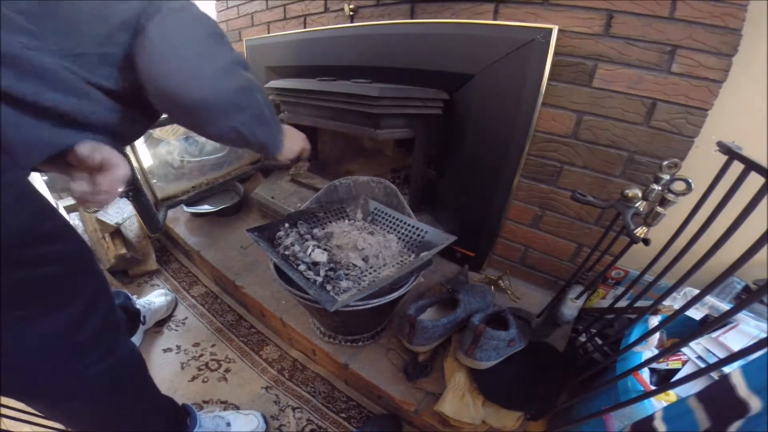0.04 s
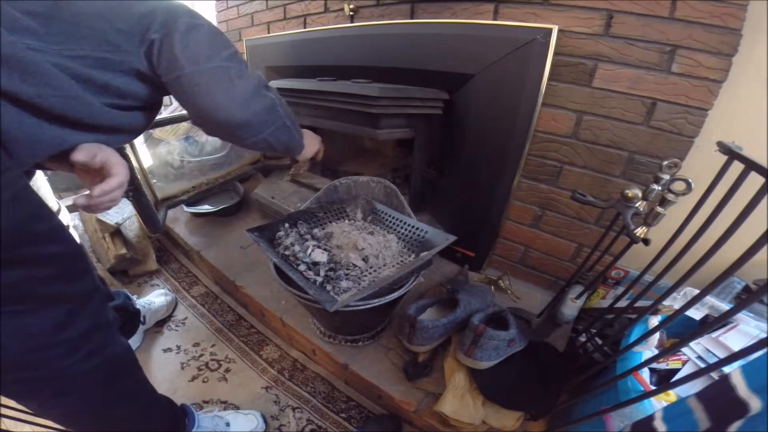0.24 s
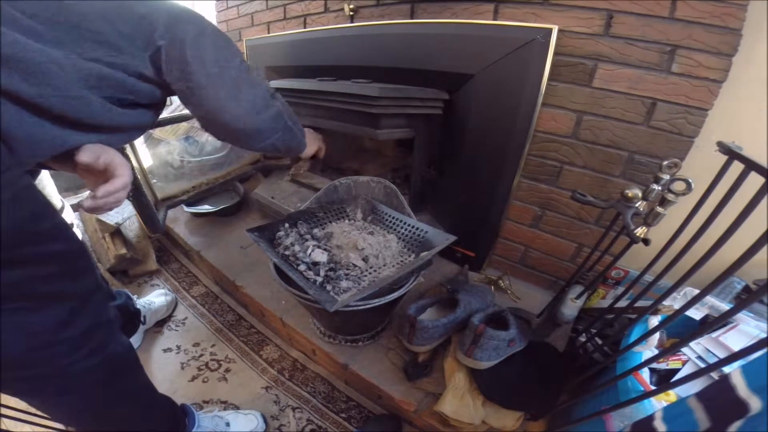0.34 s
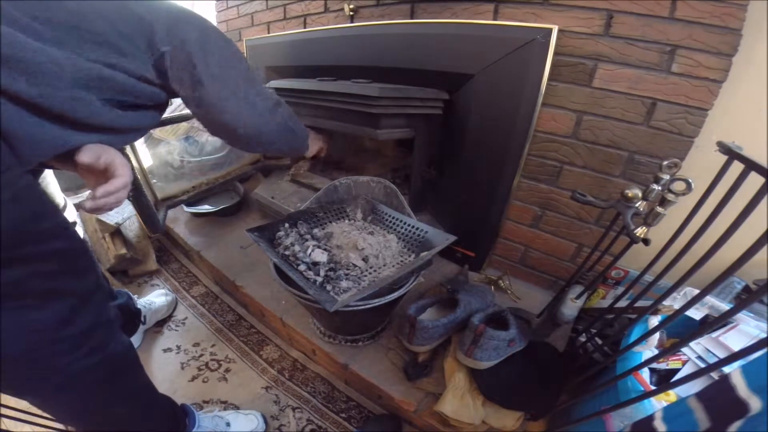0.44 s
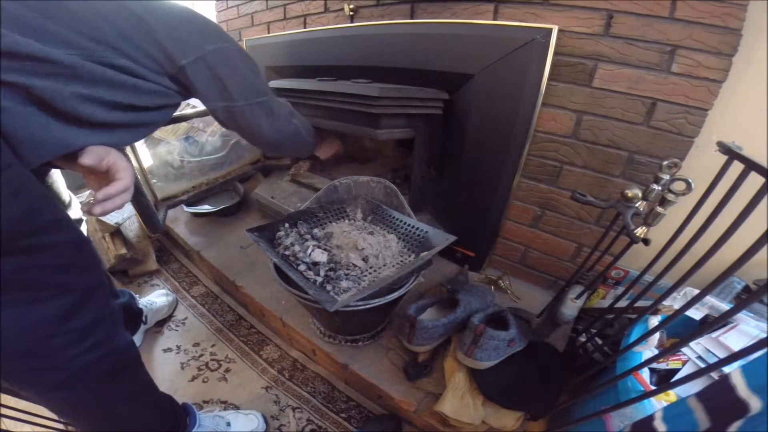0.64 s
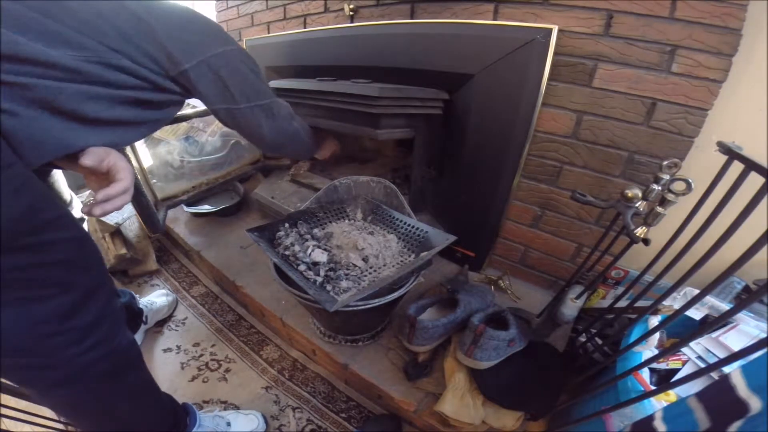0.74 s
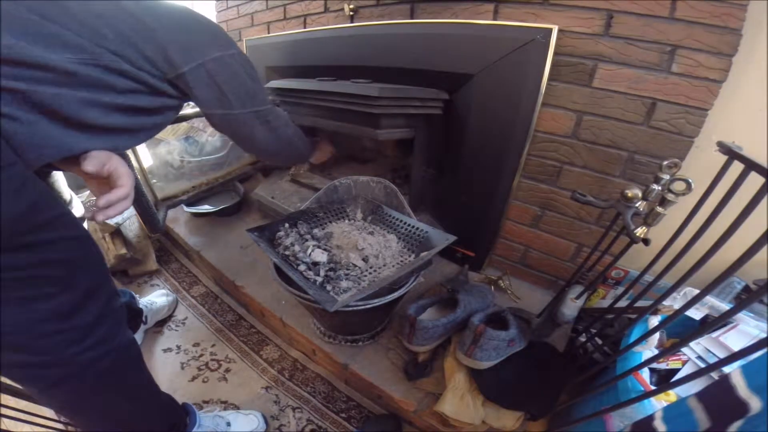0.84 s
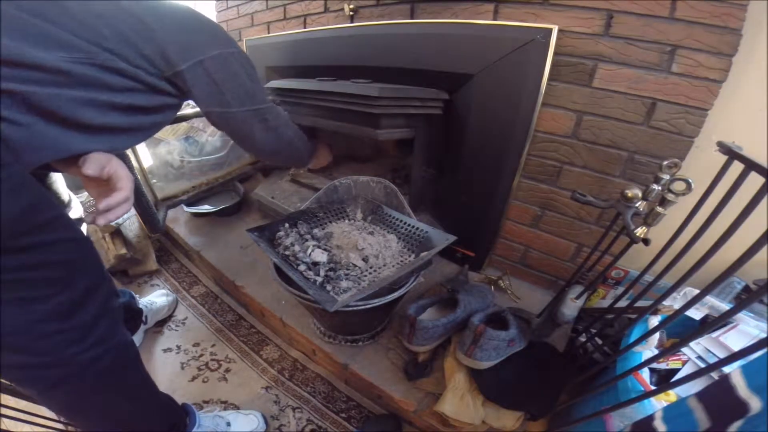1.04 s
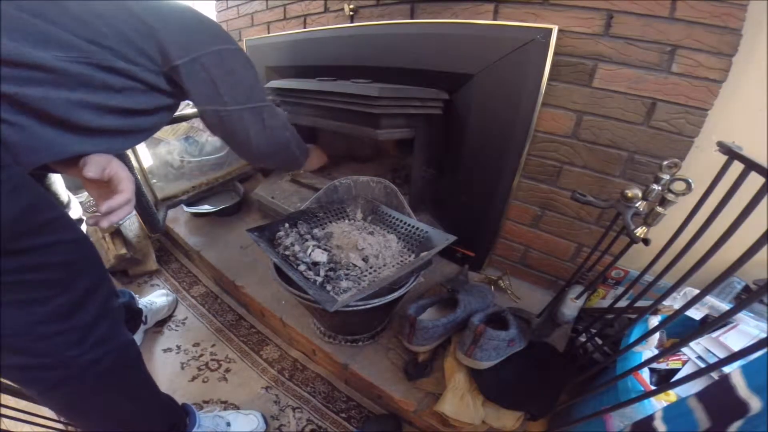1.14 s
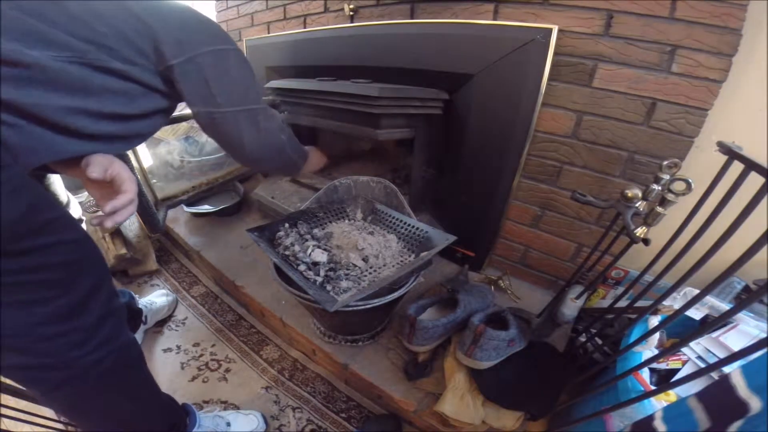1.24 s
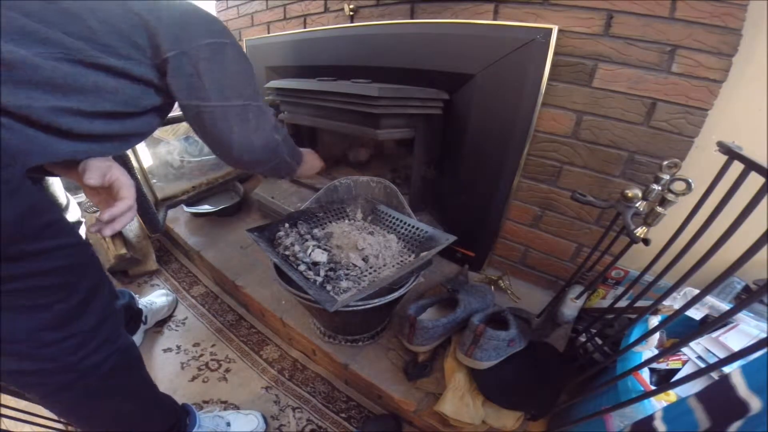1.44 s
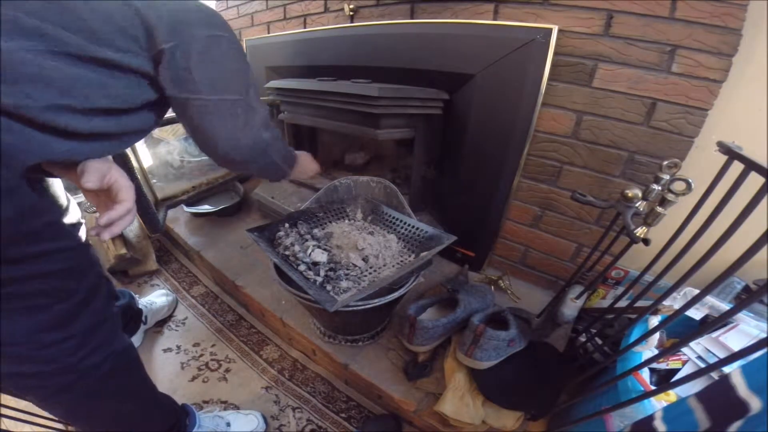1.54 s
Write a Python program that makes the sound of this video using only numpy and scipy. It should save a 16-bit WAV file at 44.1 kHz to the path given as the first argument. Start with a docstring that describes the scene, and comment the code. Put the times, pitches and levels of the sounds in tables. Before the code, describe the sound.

A small metal shovel scrapes through ash and coals inside a hollow, booming iron stove box.

```python
"""Over a quiet room and a faint pulsing whine, the iron box of a stove booms. A small steel shovel lands on
the firebox floor, is pushed through ash and coals, bumps the back and taps twice on its way out.
Random grain impacts excite the resonant modes of blade and walls and a broadband hiss; single grains and
lumps of coal are decaying sines, the boom is noise through low modes, the room shaped noise, the whine
a gated sine with a little buzz."""
import sys
import numpy as np
from scipy import signal
from scipy.fft import rfft, irfft
from scipy.io import wavfile

SR = 44100
rng = np.random.default_rng(int(sys.argv[2]) if len(sys.argv) > 2 else 0)


def generate_wav(signal):
    """Clip the signal to [-1, 1] and save it as 16-bit WAV at the path in sys.argv[1]."""
    frames = np.transpose(np.atleast_2d(signal))
    scaled = np.clip(frames, -1, 1) * 32767
    pcm = np.round(scaled).astype(np.int16)
    wavfile.write(sys.argv[1], SR, pcm)


N = 70560  # samples


def amp(db):
    """Decibels to amplitude: 20 dB is a factor of ten."""
    return 10 ** (np.asarray(db) / 20)


def rms_one(x):
    """Normalisation by the root mean square."""
    return x / np.sqrt(np.mean(x ** 2) + 1e-20)


def in_time(rows, edge_s=0.027):
    """Linear interpolation of levels over time; the first column falls silent just outside the table."""
    s, first, *rest = np.transpose(rows)
    t = np.arange(N) / SR
    outside_s = np.maximum(s[0] - t, t - s[-1])
    fade_db = 40 * np.clip(outside_s / edge_s, 0, 3)
    return [np.interp(t, s, first) - fade_db] + [np.interp(t, s, column) for column in rest]


def drift(rate_hz):
    """Low-passed noise: two equal real poles leave a slow random fluctuation of rms 1."""
    settling = 8000  # samples dropped while the filter settles
    r = np.exp(-2 * np.pi * rate_hz / SR)
    slow = signal.lfilter([1], [1, -2 * r, r * r], rng.standard_normal(N + settling))
    return rms_one(slow[settling:])


def grains(per_s, spread_db):
    """Shot noise: clicks at random instants, of uneven size and either sign, rms 1."""
    size = amp(spread_db * np.minimum(rng.exponential(1, N), 5))
    signed_size = size * rng.choice([-1, 1], N)
    return rms_one(signed_size * (rng.random(N) < per_s / SR))


def body(x, pitches_hz, modes, flutter_db=0.0):
    """Modal superposition: parallel resonators, each driven by a randomly fluctuating share of the input.

    Each mode: width in Hz, level in dB; white noise of rms 1 gives an rms near 1 without flutter."""
    flutter_hz = 33
    out, power = 0, 0
    for k, (hz, (width, db)) in enumerate(zip(pitches_hz, modes)):
        r = np.exp(-np.pi * max(width, 3) / SR)  # a wider resonance decays faster
        driven = x * amp(flutter_db * drift(flutter_hz)) + 1e-18
        zeros = np.array([1, 0, -1]) * (1 - r * r) / 2
        poles = [1, -2 * r * np.cos(2 * np.pi * hz / SR), r * r]
        sign = (-1) ** k  # neighbouring modes have opposite polarity
        out = out + sign * amp(db) * signal.lfilter(zeros, poles, driven)
        power += amp(db) ** 2 * (1 - r * r) / 2
    return out / np.sqrt(power)


def colour(x, spectrum):
    """Spectral shaping by a table of (Hz, relative dB per Hz), falling away beyond its ends.

    White noise of rms 1 gives an rms near 1."""
    hz, db = np.transpose(spectrum)
    f = np.arange(N // 2 + 1) * SR / N + 1  # offset by 1 Hz so the logarithm exists
    low_fall = np.minimum(f / hz[0], 1) ** 3
    high_fall = np.minimum(hz[-1] / f, 1) ** 3
    gain = amp(np.interp(np.log(f), np.log(hz), db)) * low_fall * high_fall
    return irfft(rfft(x) * rms_one(gain), N)


def rings(events, rise_s):
    """Damped free vibration: each blow swells over its contact time and decays exponentially."""
    out = 0
    for s, hz, db, t60 in events:
        t = np.maximum(np.arange(N) / SR - s, 0)
        swell = 1 - np.exp(-t / rise_s)
        decay = amp(db - 60 * t / t60)
        out = out + swell * decay * np.sin(2 * np.pi * (hz * t + rng.random()))
    return out


def quiet_room():
    """Stationary background noise: white noise given the room's spectrum."""
    # Spectrum of the room. Each row: frequency in Hz, relative density in dB per Hz.
    room_spectrum = [(120, -66), (200, -1.5), (363, -8), (774, -6.5), (1590, -17), (1780, -14), (1940, -16),
                     (2200, -14), (11000, -29.5), (14900, -34.5)]
    room_db = -63
    return amp(room_db) * colour(rng.standard_normal(N), room_spectrum)


def boom():
    """Low-order modes of a box: noise shakes the whole box and the floor under it at a few low pitches."""
    # Levels over time. Each row: time in seconds, then lower modes, upper modes and deepest rumble in dB.
    boom_levels = [(0.0, -43, -57, -66), (0.066, -66, -60.5, -48.5), (0.098, -66, -73, -62),
                   (0.182, -60.5, -65, -49), (0.218, -51.5, -50.5, -47.5), (0.338, -67, -55.5, -49.5),
                   (0.422, -49.5, -58, -59), (0.454, -63, -51.5, -44), (0.556, -61, -52, -52),
                   (0.632, -47.5, -47.5, -44), (0.676, -48, -47.5, -62), (0.716, -52, -45, -52),
                   (0.748, -60, -47, -47), (0.802, -38, -39.5, -48), (0.86, -44, -45, -49),
                   (0.944, -47, -53, -56), (0.97, -43.5, -49.5, -56), (1.002, -53.5, -47, -48.5),
                   (1.132, -45.5, -50.5, -46), (1.158, -54, -56.5, -45), (1.444, -56, -62, -58.5),
                   (1.5, -73, -63.5, -62), (1.536, -52, -72.5, -61.5), (1.6, -65, -58.5, -55)]
    # Pitches in Hz of the deepest, lower and upper modes.
    rumble_hz = [39, 62]
    box_low_hz = [80, 110]
    box_high_hz = [158, 182, 265, 321]
    # The same modes. Each row: width in Hz, relative level in dB.
    rumble_modes = [(12, 5), (18, -8.5)]
    box_low_modes = [(25, -1.5), (25, 2.5)]
    box_high_modes = [(14.6, -0.5), (22.4, -3), (16.2, -11), (20.4, -11.5)]

    low_db, high_db, rumble_db = in_time(boom_levels)
    # a broad second resonance confines each group of modes to its own band
    low = body(body(rng.standard_normal(N), box_low_hz, box_low_modes), [95], [(90, 0)])
    high = body(body(rng.standard_normal(N), box_high_hz, box_high_modes), [220], [(300, 0)])
    rumble = body(body(rng.standard_normal(N), rumble_hz, rumble_modes), [42], [(70, 0)])
    return amp(low_db) * rms_one(low) + amp(high_db) * rms_one(high) + amp(rumble_db) * rms_one(rumble)


def whine():
    """Amplitude modulation: a periodic gate cuts a high tone and a little buzz into regular pips."""
    tone_hz, tone_db, buzz_db = 11200, -74.5, -75
    first_s, length_s, period_s = 0.016, 0.016, 1 / 23.976  # centre of a pip, its width at 1/e, spacing
    t = np.arange(N) / SR
    from_centre_s = (t - first_s + period_s / 2) % period_s - period_s / 2
    gate = np.exp(-(2 * from_centre_s / length_s) ** 4)
    tone = np.sin(2 * np.pi * tone_hz * t)
    buzz = body(rng.standard_normal(N), [11300], [(1800, 0)])
    return gate * (amp(tone_db) * tone + amp(buzz_db) * buzz)


def coals():
    """Modal excitation by friction: coals grind on the walls as coarse grains, ringing them and crunching."""
    # Grinding over time. Each row: time in seconds, level of the lower wall modes and of the upper in dB.
    grind = [(.19, -67, -82), (.206, -69, -44.5), (.235, -57, -54), (.272, -56, -55), (.292, -57.5, -53),
             (.33, -66, -65), (.354, -61.5, -60), (.412, -63.5, -67), (.47, -69, -66), (.585, -59.5, -70),
             (.6, -44.5, -49), (.64, -52.5, -50), (.675, -54, -51.5), (.7, -44.5, -51), (.748, -65, -59),
             (.765, -44, -58), (.773, -47, -42), (.82, -60.5, -56), (.86, -51.5, -58), (.9, -60.5, -65),
             (1.0, -61.5, -67.5), (1.04, -62, -69), (1.052, -53, -44), (1.08, -57, -55.5),
             (1.15, -64, -64.5), (1.25, -66, -73.5), (1.4, -68, -81)]
    # Pitches in Hz of the lower and upper wall modes.
    wall_low_hz = [402, 440, 546, 598, 635]
    wall_high_hz = [826, 906, 1000, 1105, 1200, 1251, 1452]
    # The same modes. Each row: width in Hz, relative level in dB.
    wall_low_modes = [(29, 0), (28.4, 1), (27, -0.5), (25, -9), (21.2, -1.5)]
    wall_high_modes = [(29.6, -3.5), (30.8, 5), (62.5, -2), (52, 3.5), (34.5, 0), (32, 2), (37.6, 0)]

    crunch_db = -2.5  # against the upper wall modes
    low_db, high_db = in_time(grind)
    coal = grains(per_s=1500, spread_db=3.5)
    dull = colour(coal, [(500, 6), (1000, -4), (1800, 1.5)])
    crunch = amp(crunch_db + high_db) * dull
    low = body(amp(low_db) * coal, wall_low_hz, wall_low_modes, flutter_db=3.5)
    high = body(amp(high_db) * coal, wall_high_hz, wall_high_modes, flutter_db=2.0)
    return low + high + crunch


def blade():
    """Source and resonator: stroke and knocks set the force of the grit; blade modes and a hiss answer."""
    # Dragging over grit. Each row: time in seconds, level in dB, treble and top relative to it in dB,
    # loose ash hiss in dB (a quarter of treble plus top is added to it).
    stroke = [(.25, -58.5, -14, -30, 0), (.27, -63.5, -12, -25, -3), (.31, -62, -8, -25.5, 0),
              (.362, -54.5, -5, -18, 2.5), (.41, -62, 0.5, -14, 0.5), (.445, -46.5, -5.5, -18.5, -5),
              (.47, -45, -6.5, -27, -7), (.51, -45.5, -6, -21, -2), (.566, -49.5, -3.5, -14, -1.5),
              (.6, -45, -6, -17.5, 5), (.64, -46.5, -5, -16, -0.5), (.695, -45, -4, -13.5, 3.5),
              (.72, -51.5, -5, -17, 0), (.76, -58, -7, -12.5, 3), (.79, -59, -22, -22, -3),
              (.83, -57, -4.5, -19, -11), (.86, -59, -29, -42, -17), (.885, -70, -14, -32, -4)]
    # Brief knocks and skids. Each row: start in seconds, the same four levels in dB, then rise, hold and
    # 60 dB decay time in seconds.
    knocks = [(0.195, -42, -18, -34.5, -5, .001, 0.0034, 0.066),
              (0.201, -50.5, -5.5, -25, 3, .003, 0.012, 0.11),
              (0.281, -58.5, -17.5, -34, 3, 0.0027, 0.0065, 0.058),
              (0.617, -46, -16, -24, 1, 0.0022, 0.0063, 0.055),
              (0.729, -54, 1, -15, 0, 0.0042, .004, 0.032), (0.77, -57, -7, -15, 8, 0.0011, 0.0052, 0.021),
              (0.946, -60.5, 2, -34, -8, 0.0064, 0.025, 0.052),
              (0.979, -51.5, -8, -24, -12, 0.0027, 0.0086, 0.04),
              (1.04, -49.5, -3, -28, -1, .001, 0.011, 0.03),
              (1.054, -55.5, -20, -34, -7, 0.0035, 0.022, 0.24)]
    # Pitches in Hz of the low, high, edge and top modes of the blade.
    low_hz = [1235, 1450, 1560, 1810, 2090, 2200, 2288, 2520, 2900]
    high_hz = [3780, 4310, 5000, 5230, 5400, 5960]
    edge_hz = [6910, 7410]
    top_hz = [8680, 11400, 12500]
    # The same modes. Each row: width in Hz, relative level in dB.
    low_modes = [(70.5, -7), (24.7, -5), (35, -5), (24.6, -15.5), (33.8, -1), (41, -1.5), (29, 4),
                 (62.6, -2), (151, -9.5)]
    high_modes = [(49, 0), (29.6, -5), (50, -10), (49.5, 3.5), (61, 1.5), (123, 6)]
    edge_modes = [(40, 1), (150, -2.5)]
    top_modes = [(300, -5), (249, 7), (600, -25)]
    # Hiss of grit, main and top band. Each row: frequency in Hz, relative density in dB per Hz.
    grit_spectrum = [(900, -51), (2000, 11), (3000, 0.5), (4500, -2), (7500, -2.5), (8500, -14.5)]
    grit_top_spectrum = [(8000, -10.5), (13000, -12), (15000, -10)]

    grains_per_s, spread_db, flutter_db, hiss_db = 6000, 3.5, 1.5, 0.5
    t = np.arange(N) / SR
    level_db, treble_db, top_db, ash_db = in_time(stroke)
    ash_db = ash_db + (treble_db + top_db) / 4
    force = amp(level_db + np.array([0 * level_db, treble_db, top_db, ash_db]))
    for s, db, treble_db, top_db, ash_db, rise, hold, t60 in knocks:
        attack = np.clip((t - s) / max(rise, .0005), 0, 1)
        decay = amp(db - 60 * np.maximum(t - s - rise - hold, 0) / t60)
        balance = amp([[0], [treble_db], [top_db], [ash_db + (treble_db + top_db) / 4]])
        force = force + balance * attack * decay
    low, high, top, ash = force

    grit = grains(grains_per_s, spread_db)
    dust = grains(grains_per_s, spread_db)
    edge_force = np.sqrt(high * top)  # midway in dB between the two bands
    modes = (body(low * grit, low_hz, low_modes, flutter_db)
             + body(high * grit, high_hz, high_modes, flutter_db)
             + body(edge_force * grit, edge_hz, edge_modes, flutter_db)
             + body(top * grit, top_hz, top_modes, flutter_db))
    hiss = amp(hiss_db) * ash * colour(dust, grit_spectrum) + top * colour(dust, grit_top_spectrum)
    return modes + hiss


def pings():
    """Impulsive excitation of one mode: single hard grains catch the blade and set it ringing."""
    # Each row: start in seconds, pitch in Hz, level in dB from which the decay starts (the swell lowers
    # the actual peak), 60 dB decay time in seconds.
    ping_events = [(.1965, 2270, -36, .06), (.206, 5400, -44, 0.081), (.290, 2288, -52.5, .25),
                   (.291, 850, -47, 0.11), (.296, 1570, -50, .15), (.455, 1450, -48.5, .4),
                   (.468, 4310, -52.5, .25), (.478, 2288, -44.5, 0.22), (.506, 2288, -46, .12),
                   (.955, 3800, -61, .25), (.976, 2210, -49.5, 0.19), (.978, 5960, -54, .12),
                   (1.044, 2250, -44.5, .08), (1.044, 3850, -50.5, 0.12), (1.074, 2250, -49.5, 0.093)]
    return rings(ping_events, rise_s=0.0018)


def thuds():
    """Impact with a softer contact: lumps of coal hit the iron, each ringing mostly one mode."""
    # Each row: start in seconds, pitch in Hz, level in dB from which the decay starts (the swell lowers
    # the actual peak), 60 dB decay time in seconds.
    thud_events = [(.598, 439, -48.5, 0.23), (.685, 547, -31.5, 0.14), (.692, 819, -41.5, 0.15),
                   (0.701, 82.4, -35.5, .4), (0.704, 287, -36.5, 0.14), (.772, 404, -41.5, 0.15),
                   (.778, 156, -32.5, 0.3), (.798, 108, -37.5, 0.23), (0.847, 561, -46.5, 0.18),
                   (1.105, 155.6, -39.5, 0.23)]
    return rings(thud_events, rise_s=0.0035)


def scene():
    """Linear superposition of shovel, coals and box in the room, on one channel."""
    shovel = blade() + pings()
    stove = coals() + thuds() + boom()
    return (shovel + stove + quiet_room() + whine())[None]


def record(dry):
    """Band limitation: a steep low-pass holds everything from 15350 Hz up at least 60 dB down."""
    low_pass = signal.cheby2(14, 60, 15350, fs=SR, output="sos")
    return signal.sosfilt(low_pass, dry)


dry = scene()
out = record(dry)
generate_wav(out)
```